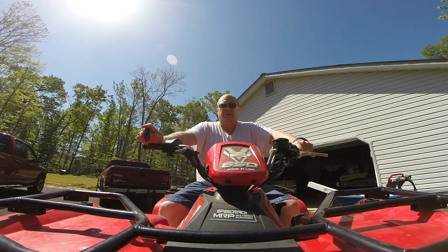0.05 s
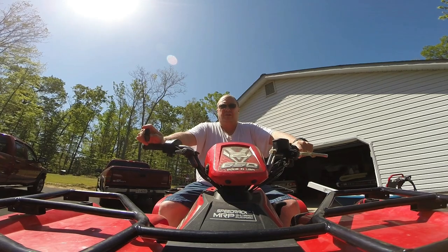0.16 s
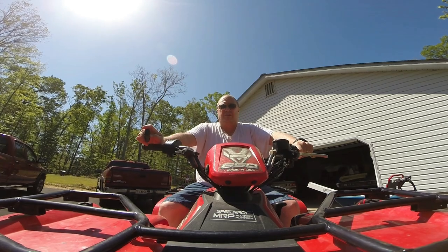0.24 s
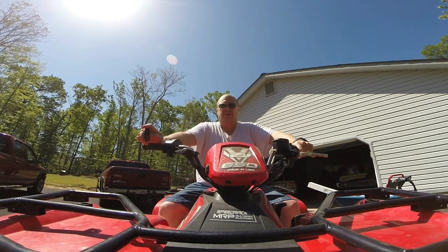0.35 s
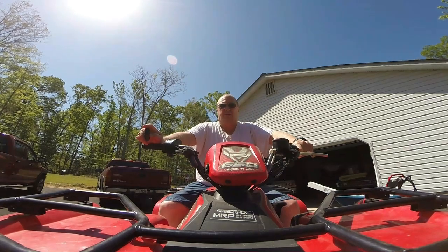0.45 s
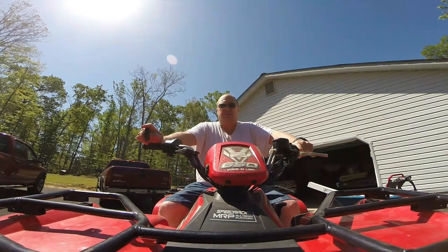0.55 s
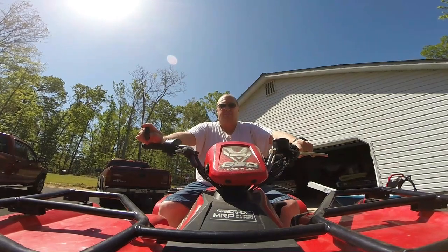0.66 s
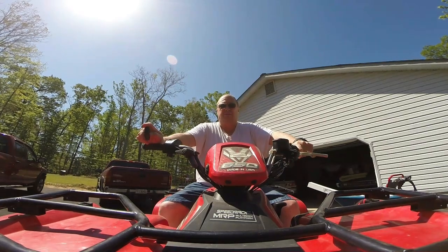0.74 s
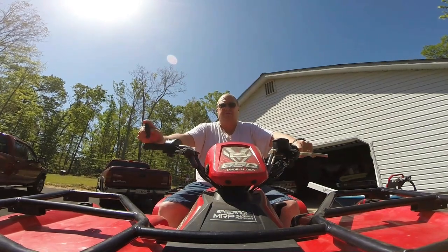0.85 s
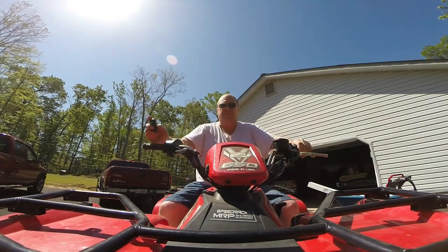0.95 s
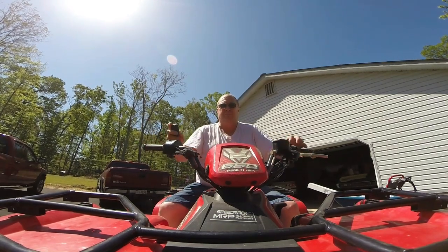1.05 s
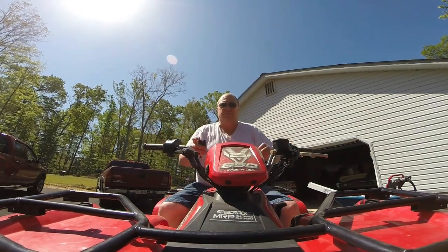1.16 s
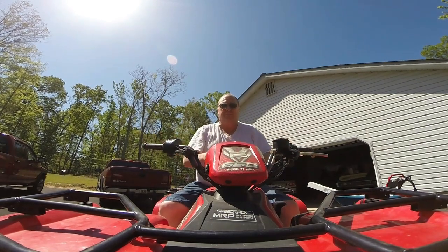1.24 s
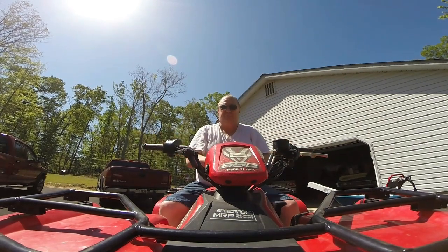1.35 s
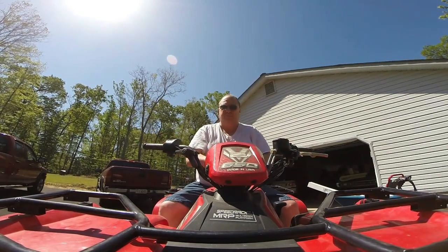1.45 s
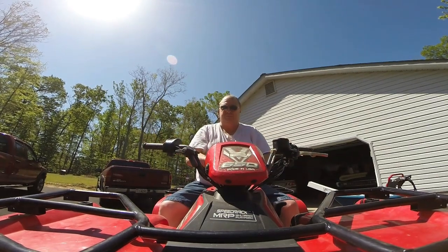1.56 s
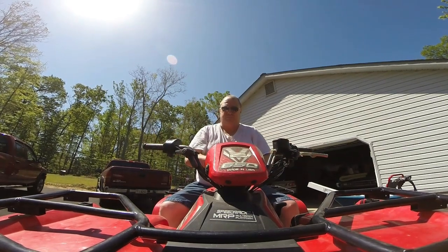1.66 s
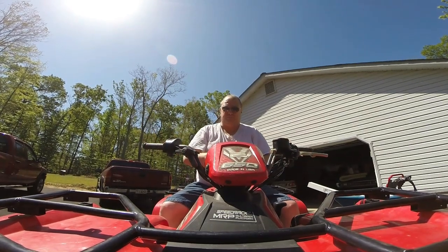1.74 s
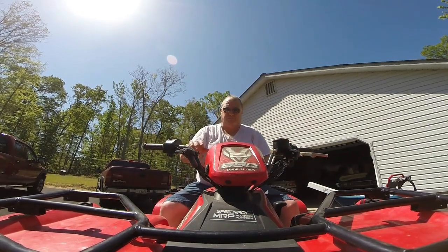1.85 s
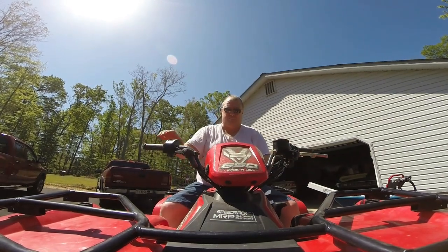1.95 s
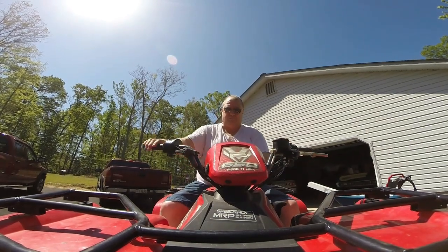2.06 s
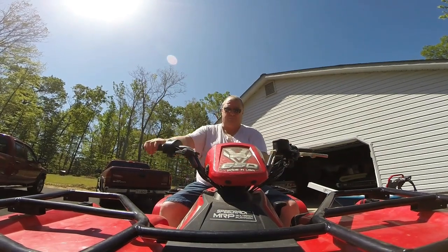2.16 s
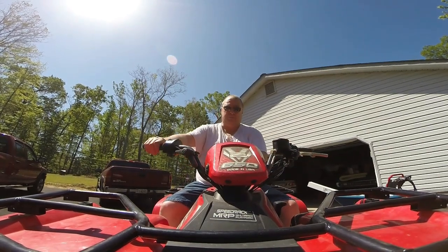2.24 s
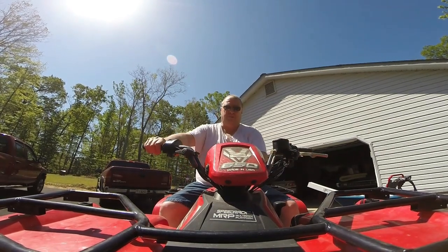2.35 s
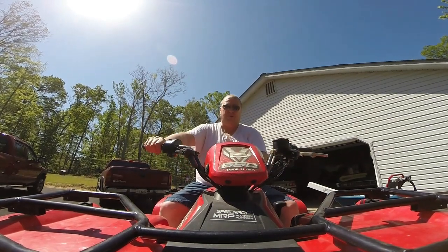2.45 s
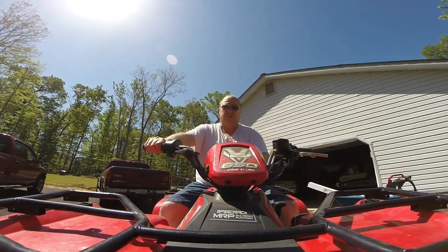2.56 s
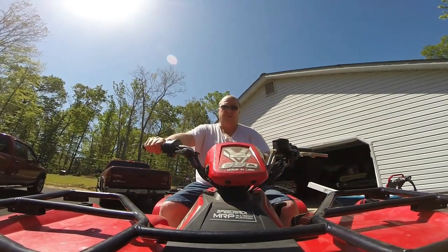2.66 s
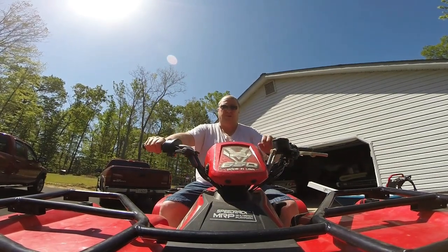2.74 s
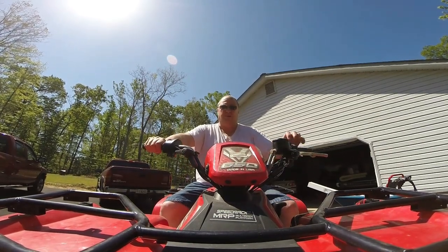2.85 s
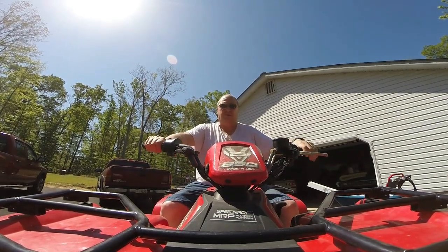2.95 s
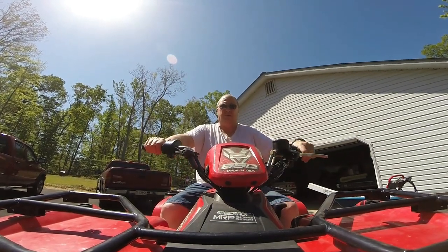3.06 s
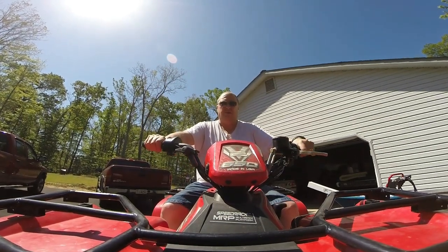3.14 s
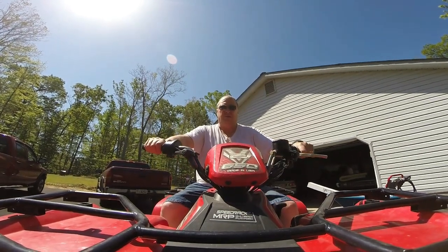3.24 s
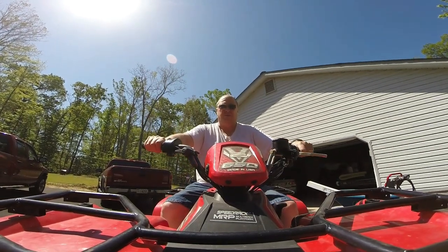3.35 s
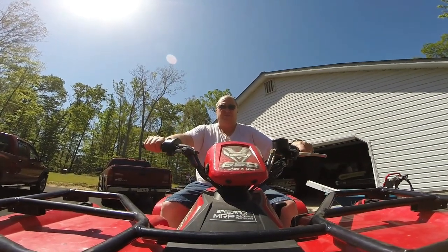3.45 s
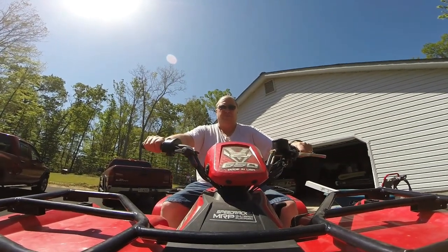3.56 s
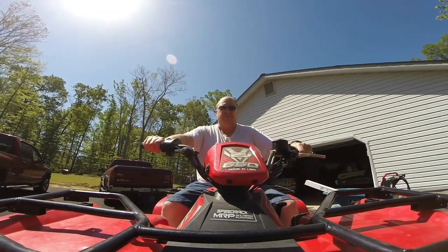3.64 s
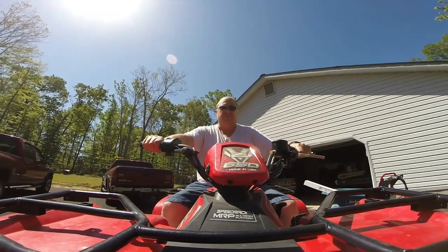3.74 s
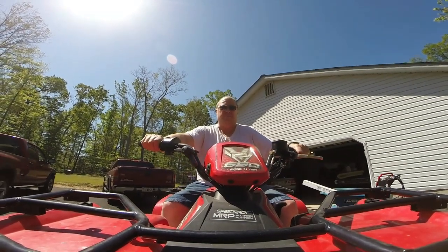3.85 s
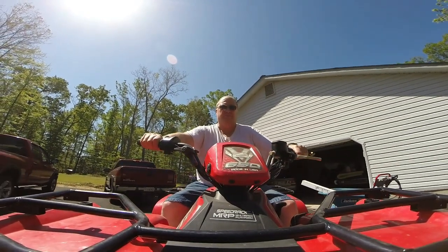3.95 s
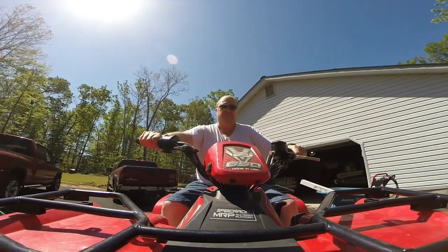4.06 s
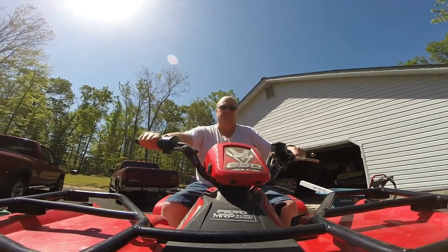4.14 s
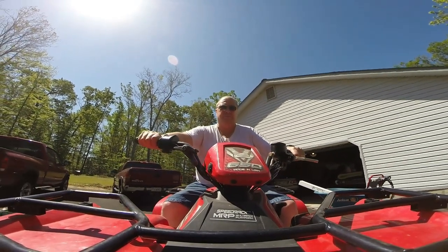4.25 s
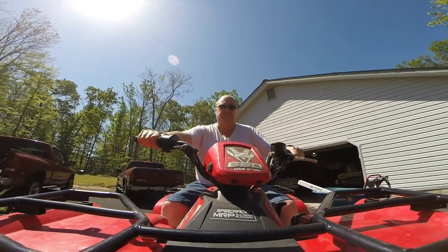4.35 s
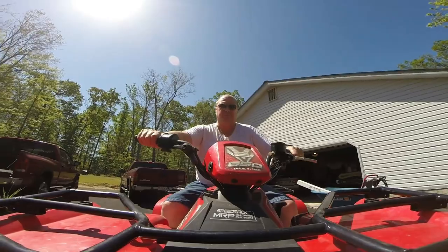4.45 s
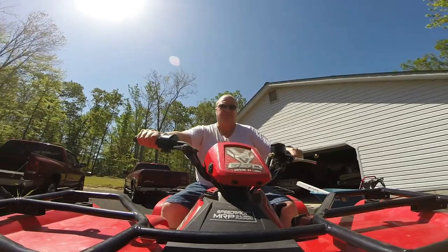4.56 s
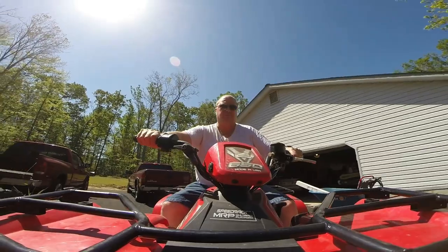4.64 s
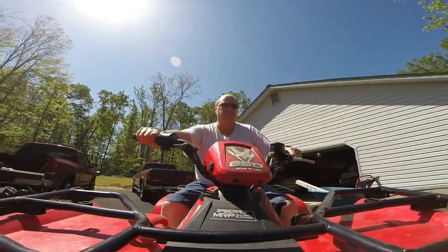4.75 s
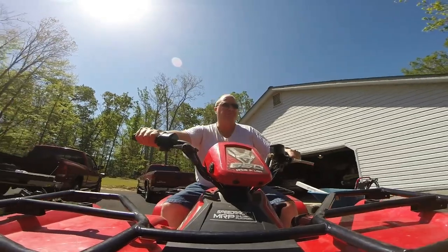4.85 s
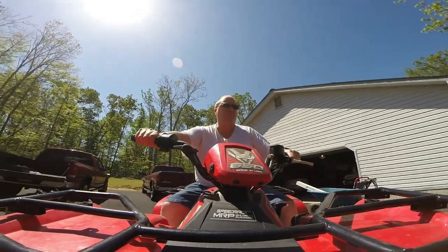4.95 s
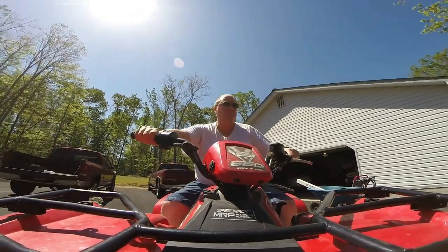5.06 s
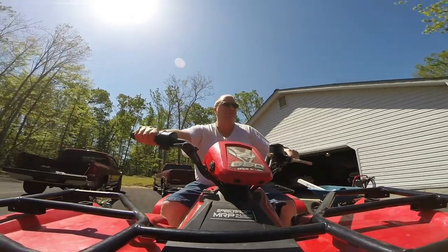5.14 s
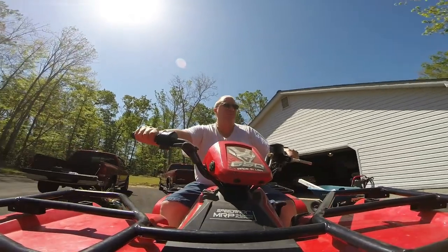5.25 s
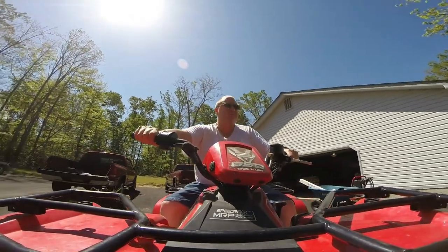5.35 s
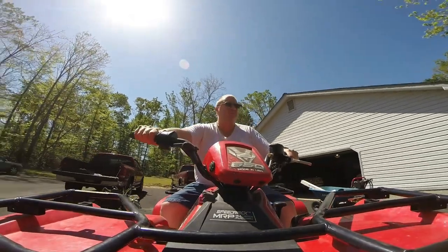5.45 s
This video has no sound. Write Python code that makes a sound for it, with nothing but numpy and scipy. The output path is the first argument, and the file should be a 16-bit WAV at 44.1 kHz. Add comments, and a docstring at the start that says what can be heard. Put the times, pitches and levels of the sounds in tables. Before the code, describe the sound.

Close on a small quad bike outdoors, its two-cylinder engine idles with lumpy, paired low thuds, light mechanical clatter and whirr. Thin high birds chirp faintly early on. Near three seconds the throttle opens, the beats harden and quicken, and fuse into a loud, rough drone with plastic body hum, wavering slightly until the end. The microphone rides on the machine.

```python
"""V-twin engine idling, then pulling away

A four-stroke V-twin idles with two uneven beats a cycle, then speeds up under load.
Pulses ring pipe and frame resonances; as the speed rises they merge into a drone of engine orders.
Filtered noise and decaying strokes make the whirr and clatter, and noise shudders and hums in the plastic.
During the idle, small birds call thinly in swept and trilled sines smeared by a short echo."""
import sys
import numpy as np
from scipy import signal
from scipy.fft import rfft, irfft
from scipy.io import wavfile
from scipy.ndimage import uniform_filter1d

SR = 44100
rng = np.random.default_rng(int(sys.argv[2]) if len(sys.argv) > 2 else 0)


def persist_wave(psi):
    """Save psi, clipped to +-1, as 16-bit WAV."""
    counts = np.round(np.clip(psi, -1, 1) * 32767).astype(np.int16)
    wavfile.write(sys.argv[1], SR, np.atleast_2d(counts).T)


N = 242550
TIME = np.arange(N) / SR


def undb(db):
    """Decibel law: amplitude ratio of a level in dB."""
    return 10 ** (np.asarray(db) / 20)


def unit(x):
    """Normalisation: scale to rms 1."""
    return x / np.sqrt(np.mean(x ** 2))


def curve(rows):
    """Linear interpolation: join (s, value) rows by straight lines."""
    return np.interp(TIME, *np.transpose(rows))


def walk(rate_hz):
    """Smoothed random modulation: levels held 1 / rate_hz s and slewed twice, with a spread near 1."""
    hold = int(SR / rate_hz)
    steps = np.repeat(rng.standard_normal(N // hold + 1), hold)
    return 1.43 * uniform_filter1d(uniform_filter1d(steps, hold), hold)[:N]


def colour(x, points):
    """Linear filtering: shape a signal by a (Hz, dB) spectrum, joined along log frequency."""
    point_hz, point_db = np.transpose(points)
    f = np.fft.rfftfreq(N, 1 / SR) + 1
    gain = undb(np.interp(np.log(f), np.log(point_hz), point_db))
    return irfft(rfft(x) * gain, N)


def noise(points):
    """Coloured noise: Gaussian noise of rms 1 with a (Hz, dB) spectrum."""
    return unit(colour(rng.standard_normal(N), points))


def ring(x, modes):
    """Modal resonance: each mode is passed twice, so that it swells before it dies."""
    f = np.fft.rfftfreq(2 * N, 1 / SR) + 1e-6
    response = 0
    for hz, width, db in modes:
        response = response + undb(db) / (1 + 1j * (f * f - hz * hz) / (f * width)) ** 2
    return irfft(rfft(x, 2 * N) * response)[:N]


# Mean engine speed, idle then acceleration; one cycle is two crank turns: time_s, cycle_rate_hz
SPEED = [(0, 8.8), (2.78, 8.8), (3.16, 16.3), (3.4, 18.63), (3.6, 19.1), (3.8, 19.28), (4, 19.93),
         (4.2, 20.38), (4.4, 20.47), (4.6, 20.34), (4.8, 20.57), (5, 20.33), (5.15, 19.67), (5.3, 18.96),
         (5.5, 20.11)]
# Hunting of the idle about its mean speed: time_s, cycle_rate_change_hz
HUNT = [(0, -.2), (.2, 1.5), (.42, -1.45), (.53, 1.2), (.76, -.97), (.9, -.08), (1.1, 1.25), (1.2, -.37),
        (1.35, .47), (1.5, -.15), (2.1, .04), (2.35, -.46), (2.57, .95), (2.68, -1.38), (2.78, 0)]


def crank():
    """Phase integration: the hunting speed, summed over time, gives the engine's place in its cycles."""
    mean_hz = curve(SPEED)
    cycle = np.cumsum(mean_hz + curve(HUNT)) / SR
    return cycle, mean_hz


# Throttle, which loads the exhaust before the clutch bites: time_s, opening_0_to_1
THROTTLE_OPENING = [(2.8, 0), (3.06, 1)]


def throttle():
    """Load control: the opening sets how hard the exhaust is driven."""
    return curve(THROTTLE_OPENING)


# cycle rates at which the belt clutch starts to bite and carries the full load
BITE_HZ, FULL_LOAD_HZ = 11, 15


def load_at(hz):
    """Centrifugal clutch: the share of full load, 0-1, grows linearly with the cycle rate."""
    return np.clip((hz - BITE_HZ) / (FULL_LOAD_HZ - BITE_HZ), 0, 1)


def merged_at(hz, merge_hz=16.6, span_hz=.95):
    """Fusion of pulses: the merged share, 0-1, is a smooth step centred on one cycle rate."""
    return 1 / (1 + np.exp((merge_hz - hz) / span_hz))


# place of the first beat, and lags of the jolt and the second beat behind it (cycles)
FIRING_PLACE, JOLT_LAG, SECOND_LAG = .226, .132, .28
# spread of the beats' timing and strength, and extra strength spread at full load
JITTER_S, SCATTER_DB, SCATTER_LOAD_DB = .00018, .5, .8


def stroke_times(cycle, hz, lag):
    """Cyclic timing with jitter: the sample at which each beat falls, lagging the firing by a share of a cycle."""
    chance = rng.standard_normal(size=100)
    marks = np.arange(len(chance)) + FIRING_PLACE
    start_s = np.interp(marks, cycle, TIME)
    beat_s = start_s + lag / np.interp(start_s, TIME, hz) + JITTER_S * chance
    beat_s = beat_s[marks < cycle[-1]]
    return (beat_s[beat_s < TIME[-1]] * SR).astype(int)


def beat(cycle, hz, load, modes, lag):
    """Impulse excitation: one pulse a cycle rings the modes, more unevenly under load."""
    at = stroke_times(cycle, hz, lag)
    spread_db = SCATTER_DB + SCATTER_LOAD_DB * load[at]
    pulses = np.zeros(N)
    pulses[at] = undb(spread_db * rng.standard_normal(size=100)[:len(at)])
    return ring(pulses, modes)


# Pipe modes rung by the first beat: pitch_hz, width_hz, relative level_db
FIRST_PIPE = [(49.4, 16.5, -4.5), (64.5, 28.4, -5.2), (186.7, 30, -9)]
# Pipe modes rung by the second beat: pitch_hz, width_hz, relative level_db
SECOND_PIPE = [(38.2, 12.5, -13.5), (111, 32.6, -.5), (151.7, 16.4, -2.5), (183.1, 26.5, -14),
               (214, 24.6, -10), (312, 45, -16.5)]
# Frame modes rung by the combustion jolt: pitch_hz, width_hz, relative level_db
FRAME = [(203, 19, -6), (249.6, 70, -22), (410, 50, -30), (582, 50, -33), (750, 60, -37)]
# rms over the whole scene before gains, gain at full load, change once merged
BEATS_DB, BEATS_LOAD_DB, BEATS_MERGED_DB = -19.5, 5.5, -26


def exhaust(cycle, hz, load, thud_load_db=-6, jolt_load_db=5):
    """Pipe and frame resonance: a low thud recedes under load, a jolt hardens, a higher beat follows."""
    first = beat(cycle, hz, load, FIRST_PIPE, 0) * undb(thud_load_db * load)
    jolt = beat(cycle, hz, load, FRAME, JOLT_LAG) * undb(jolt_load_db * load)
    second = beat(cycle, hz, load, SECOND_PIPE, SECOND_LAG)
    level_db = BEATS_DB + BEATS_LOAD_DB * load + BEATS_MERGED_DB * merged_at(hz)
    return unit((first + jolt + second) / np.sqrt(hz)) * undb(level_db)


# Engine orders of the drone: multiple of the cycle rate, relative level_db
ORDERS = [(2, 1.5), (3, 3), (4, 0.5), (5, 1), (6, -1), (7, -3.5), (8, 3.5), (9, -13.5), (10, -8.5),
          (11, -9), (12, -15.5), (13, -10.5), (14, -27), (15, -16.5), (16, -12.5), (17, -18.5), (18, -28.5),
          (19, -22.5), (21, -21), (22, -18), (23, -19), (24, -26), (26, -27.5), (28, -20), (36, -23.5),
          (42, -21.5), (48, -27.5), (56, -26.5)]
# Drone balance: time_s, orders_2_to_3_db, orders_4_to_7_db, orders_from_8_db (all relative)
DRONE_LEVELS = [(3.1, 8, 5, 2.5), (3.3, -1, 2, 0.5), (3.45, 0.5, 1.5, -0.5), (3.7, -7, 2.5, -0.5),
                (4, 0.5, 3.5, -1), (4.3, -0.5, 2, -3), (4.55, 1, -0.5, -0.5), (4.8, -1.5, 2, -0.6),
                (5.05, -4.5, -2, -1.5), (5.2, 0, 0, -5.5), (5.4, 5, -1, 1), (5.5, 3, -1, -7.5)]
# lag of the second cylinder (cycles), its strength against the first, silencer's phase spreading (cycles)
FIRING_GAP, SECOND_SHARE, SILENCER_SPREAD = .62, .9, .04
DRONE_DB = -16


def drone(cycle, hz, waver_db=1.03, flutter_cycles=0.0016):
    """Harmonic synthesis: merged beats sound as engine orders, lifted by panels and blurred by crank flutter."""
    angle = cycle + flutter_cycles * walk(25)
    times, *levels = np.transpose(DRONE_LEVELS)
    lines = 0
    for order, db in ORDERS:
        group = int(order >= 4) + int(order >= 8)
        balance_db = np.interp(TIME, times, levels[group])
        gain = undb(db + balance_db + panel_lift_db(order * hz) + waver_db * walk(2.3))
        # the second cylinder shifts each order's phase
        twin = np.angle(1 + SECOND_SHARE * np.exp(-2j * np.pi * order * FIRING_GAP))
        # phase growing with the order squared spreads the beats until they overlap
        spread = SILENCER_SPREAD * order * (order + rng.random() / 2)
        lines = lines + gain * np.sin(2 * np.pi * (order * angle + spread) + twin)
    return lines * merged_at(hz) * undb(DRONE_DB) / np.sqrt(2)


# Clatter strokes in each cycle: place_in_cycle_0_to_1, decay_s, relative level_db
STROKES = [(.335, 0.0068, 0), (.385, 0.0098, 4.5), (.53, 0.016, -3), (0.799, 0.0053, -8), (.96, 0.02, 0.5)]
# Spectrum of the clatter: frequency_hz, relative level_db per Hz
CLATTER = [(250, 5.5), (420, 9.5), (600, 1.5), (780, 2.5), (1100, 5), (1550, 1), (2300, -13), (4000, -18),
           (8000, -40), (15000, -79)]
# spread of the strokes' strength, and gain of the fresh rattle beside the repeating part
STROKE_SCATTER_DB, FRESH_RATTLE_DB = 1.2, -2


def clatter(cycle, rise_s=0.0023):
    """Impact response: combustion knock and closing valves ring alike each cycle, with some fresh rattle."""
    age = TIME[:SR // 10]
    marks = np.arange(-1, 100)
    rings = rattle = 0
    for place, decay_s, db in STROKES:
        at = np.searchsorted(cycle, marks + place)
        size = undb(db + STROKE_SCATTER_DB * rng.standard_normal(len(at)))
        heard = (at > 0) & (at < N)
        blows = np.bincount(at[heard], size[heard], N)
        fade = np.exp(-age / decay_s) * (1 - np.exp(-age / rise_s))
        rings = rings + signal.fftconvolve(blows, fade * rng.standard_normal(len(age)))[:N]
        rattle = rattle + signal.fftconvolve(blows, fade)[:N]
    fresh = undb(FRESH_RATTLE_DB) * rattle * rng.standard_normal(N)
    return unit(colour(rings + fresh, CLATTER))


# Whirr spectrum at idle: frequency_hz, relative level_db per Hz
IDLE_NOISE = [(200, -16.5), (330, -0.5), (450, -1), (550, -6), (720, -5), (1000, -14), (2000, -19),
              (3000, -25), (4000, -29), (5400, -31), (6500, -36), (8500, -39.5), (11000, -47),
              (15000, -57.5)]
# Whirr spectrum under load: frequency_hz, relative level_db per Hz
LOAD_NOISE = [(180, -21), (300, 4.5), (380, -1.5), (450, 3), (550, -5.5), (850, -8), (1200, -12),
              (2000, -17.5), (3000, -23), (3900, -29.5), (5500, -31), (8000, -39), (11000, -45),
              (15000, -56.5)]
# Modes of the casings and the drive: pitch_hz, width_hz, relative level_db
CASING = [(985, 25, 17), (1780, 80, 1), (2260, 80, 0), (3740, 160, -7), (4545, 420, -1.5),
          (5305, 460, -4.5), (7600, 1000, -13)]
# common gain where the clutch bites, added gain at full load, rise per doubling of speed
MACHINE_DB, MACHINE_LOAD_DB, MACHINE_DOUBLING_DB = -39.5, 4, 5
# start of the roll, and slight level drift from then on
ROLL_S, ROLL_DB_PER_S = 3.14, -0.01


def machinery(cycle, hz, load, grain_db=1.19, casing_flicker_db=2.0):
    """Broadband excitation: chains, belt and gears whirr louder with speed and ring the casings unevenly."""
    idle_whirr = undb(2.5) * np.sqrt(1 - load) * noise(IDLE_NOISE)
    load_whirr = undb(4.5) * np.sqrt(load) * noise(LOAD_NOISE)
    whirr = (idle_whirr + load_whirr) * undb(grain_db * walk(160))
    casing = unit(ring(rng.standard_normal(N), CASING))
    casing = casing * undb(-21.0 + 7.2 * load + casing_flicker_db * walk(40))
    strokes = clatter(cycle) * undb(-1.0 - 8.5 * load)
    roll_db = ROLL_DB_PER_S * np.maximum(TIME - ROLL_S, 0)
    speed_db = MACHINE_DOUBLING_DB * np.log2(hz / BITE_HZ)
    level_db = MACHINE_DB + MACHINE_LOAD_DB * load + roll_db + speed_db
    return (whirr + casing + strokes) * undb(level_db)


# Spectrum of the bodywork's shudder: frequency_hz, relative level_db per Hz
RUMBLE = [(15, -42.5), (28, -10.5), (52, -2), (85, -5.5), (130, -3), (195, 2.5), (250, -4.5), (290, -10),
          (330, -12.5), (500, -49.5), (4000, -120)]
# Modes of the plastic panels: pitch_hz, width_hz, relative level_db
PANELS = [(207.8, 16.5, -2.5), (245.7, 35, -1), (318.7, 35, -5)]
# rms level at idle and gain at full load, for the shudder and the hum
SHUDDER_DB, SHUDDER_LOAD_DB, HUM_DB, HUM_LOAD_DB = -30.5, 10, -38, 8


def bodywork(load):
    """Panel vibration: low noise shudders and noise-driven modes hum, both louder under load."""
    shudder = noise(RUMBLE) * undb(SHUDDER_DB + SHUDDER_LOAD_DB * load)
    hum = unit(ring(rng.standard_normal(N), PANELS)) * undb(HUM_DB + HUM_LOAD_DB * load)
    return shudder + hum


def panel_lift_db(hz, lift_db=8):
    """Resonant gain: a tone is lifted as it meets a panel mode, by lift_db plus half the mode's level."""
    lift = 0
    for centre, width, db in PANELS:
        lift = lift + (lift_db + db / 2) / (1 + (2 * (hz - centre) / width) ** 2)
    return lift


# Bird notes: start_s, length_s, start_pitch_hz, end_pitch_hz, trill_depth_hz, relative level_db
BIRD = [(0.236, 0.08, 5250, 5360, 40, -51), (0.76, 0.12, 8130, 8300, 40, -58),
        (0.963, 0.15, 8720, 8700, 121, -57.5), (0.99, 0.11, 8080, 8020, 110, -56),
        (1.185, 0.07, 8800, 8800, 130, -54), (1.225, .13, 8250, 7800, 169, -56.5),
        (1.455, 0.11, 8800, 8750, 228, -56), (1.49, .15, 8230, 8160, 50, -57)]


def bird(trill_hz=95, woods_s=0.06):
    """Frequency modulation: thin notes glide, trill and waver, smeared by the trees' decaying echo."""
    song = np.zeros(N)
    for start_s, length_s, start_hz, end_hz, depth_hz, db in BIRD:
        u = np.clip((TIME - start_s) / length_s, 0, 1)
        trill = np.sin(2 * np.pi * trill_hz * TIME) + walk(590)
        hz = start_hz + (end_hz - start_hz) * u + depth_hz * trill
        swell = np.sqrt(4 * u * (1 - u))
        song += undb(db) * swell * np.sin(2 * np.pi * np.cumsum(hz) / SR)
    echo = rng.standard_normal(SR // 2) * np.exp(-TIME[:SR // 2] / woods_s)
    smeared = signal.fftconvolve(song, echo / np.linalg.norm(echo))[:N]
    return 0.34 * song + 0.32 * smeared


def scene():
    """Superposition: one crank drives every layer of the machine, and the birds are added."""
    cycle, hz = crank()
    load = load_at(hz)
    engine = exhaust(cycle, hz, throttle()) + drone(cycle, hz)
    mix = engine + machinery(cycle, hz, load) + bodywork(load) + bird()
    return mix[None]


def record(dry, ceiling=.85, top_hz=15000):
    """Soft saturation and low-pass filtering: the highest peaks are rounded and the top is cut."""
    rounded = dry / (1 + (dry / ceiling) ** 6) ** (1 / 6)
    return signal.sosfilt(signal.ellip(8, .2, 70, top_hz, fs=SR, output="sos"), rounded)


dry = scene()
out = record(dry)
persist_wave(out)
```